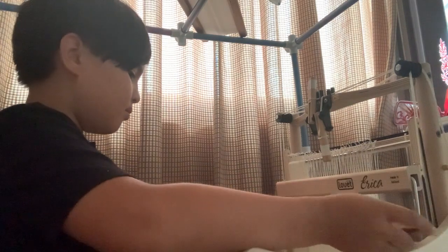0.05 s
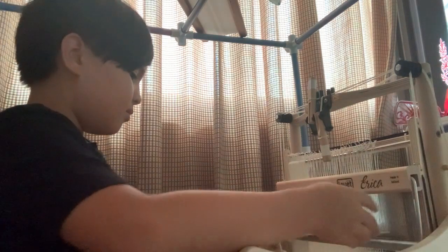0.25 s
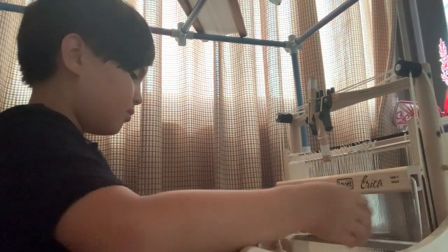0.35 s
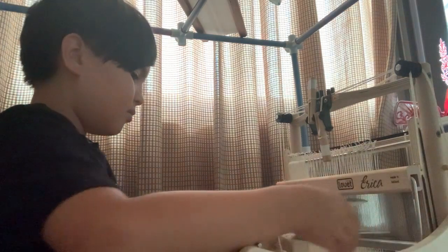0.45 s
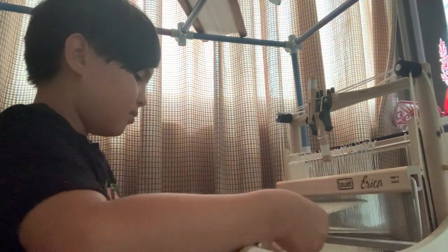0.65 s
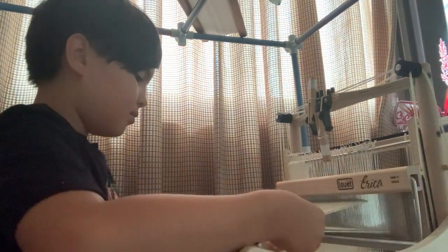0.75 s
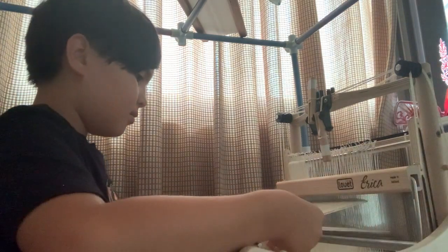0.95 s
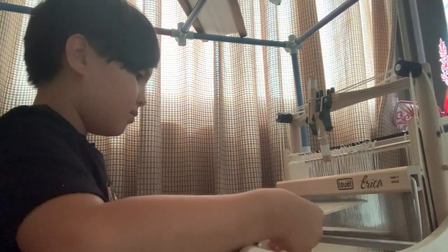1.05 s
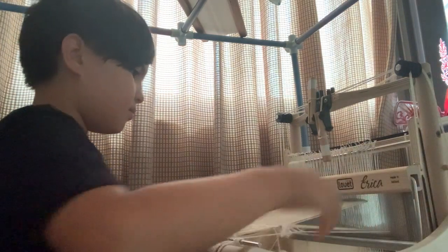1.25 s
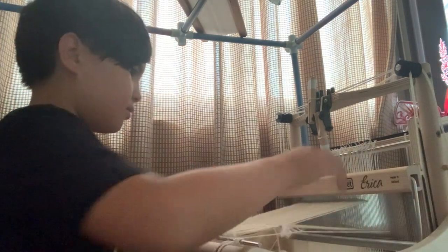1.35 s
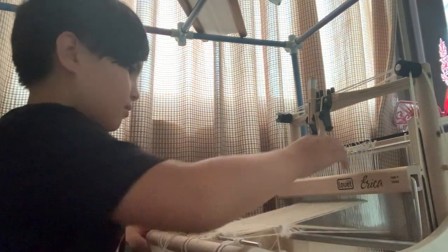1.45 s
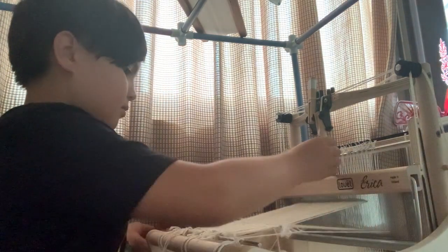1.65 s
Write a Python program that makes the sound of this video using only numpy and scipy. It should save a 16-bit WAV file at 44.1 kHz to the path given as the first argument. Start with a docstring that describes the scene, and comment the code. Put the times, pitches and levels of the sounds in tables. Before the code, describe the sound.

A wooden table loom clacks and ticks, heard close in a small room. A metal fitting clicks at about 0.1 seconds, then a part slides and drops with a sharp clack near 0.25 seconds, rebounding once. Soft hand bumps and faint clicks come around 0.5 and 0.75 seconds. A light stick ticks near 0.9, 1.1 and 1.2 seconds. Low rumble, hum and faint hiss lie underneath.

```python
"""Table loom in a small room

One microphone, close to a wooden loom worked by hand. A metal fitting clicks, then a wooden part
slides and drops against the frame with a sharp clack and one rebound; later a light stick ticks against
the loom. The hand bumps the wood softly in between. Each blow rings a few modes over a dense crack of
noise, sliding is a run of tiny slips, and the walls answer. Low rumble, hum and faint hiss lie under it."""
import sys
import numpy as np
from scipy import signal
from scipy.fft import rfft, irfft
from scipy.io import wavfile

SR = 44100
rng = np.random.default_rng(int(sys.argv[2]) if len(sys.argv) > 2 else 0)


def waveform_to_disk(signal):
    """Save audio, clipped to [-1, 1], as 16-bit WAV at the path in sys.argv[1]."""
    frames = np.transpose(np.atleast_2d(signal))
    scaled = np.clip(frames, -1, 1) * 32767
    samples = np.round(scaled).astype(np.int16)
    wavfile.write(sys.argv[1], SR, samples)


N = 74970
T = np.arange(N) / SR

# room tone: (frequency [Hz], relative spectral level [dB])
AIR_SPECTRUM = [(20, -44), (40, -13.5), (56, -0.5), (80, -5), (110, -11), (160, -11.5), (230, -15.5),
                (340, -15.5), (550, -20), (1100, -25.5), (3000, -30.5), (7000, -33), (14500, -32.5),
                (16000, -35.5)]
# moving parts rub: (start [s], stop [s], start level [dB], stop level [dB])
RUBS = [(0.0, 0.162, -92.5, -59.5), (0.126, 0.264, -67.5, -58.5), (0.23, 0.245, -54, -39),
        (0.49, 0.813, -77.5, -75.5), (1.074, 1.402, -68.5, -81)]
# resonances under the rubbing: (frequency [Hz], width [Hz], relative level [dB])
RUB_RESONANCES = [(1720, 26, -8), (2460, 250, -7), (3560, 74, -4), (7400, 220, -9.5)]

# blows on the fittings, by the hand, on the frame and of the stick:
# (time [s], gain [dB], bass cut [Hz], treble cut [Hz], gain of the modes over the crack [dB])
FITTING_CLICKS = [(0.1385, -39, 190, 16300, -4), (0.2715, -30, 1470, 2200, -7),
                  (0.5100, -48.5, 503, 8000, -2), (0.6820, -61.5, 2000, 6910, -11.5),
                  (0.7413, -62, 200, 9100, 0), (1.2475, -60.5, 1930, 13900, 6)]
HAND_BUMPS = [(0.1395, -56, 1804, 2480, -1.5), (0.5115, -49.5, 400, 2000, -1), (0.7425, -57, 100, 990, 0),
              (0.7755, -64.5, 199, 1200, 7.5), (1.2450, -57.5, 97, 1199, 0.5)]
FRAME_CLACKS = [(0.2343, -22.5, 1995, 14260, -6.5), (0.2360, -22.5, 60.4, 5000, 1.5),
                (0.3003, -25, 805, 4100, -7)]
STICK_TICKS = [(0.8882, -48, 2040, 14000, -1), (1.0260, -64.5, 1968, 9100, 2),
               (1.0822, -55, 990, 8850, 0.5), (1.0898, -49.5, 1010, 9900, -2),
               (1.2226, -47, 2980, 8850, -1), (1.2430, -57, 4070, 12000, -4),
               (1.2468, -50, 4120, 9900, -12.5)]
# the modes each one rings: (frequency [Hz], relative level [dB], t60 [s])
FITTING_RING = [(3401, -9.5, 0.036), (3614, -5.5, .1), (3700, 4.5, 0.024), (3667, -3, 0.051),
                (4250, -29, 0.039), (7030, -9.5, 0.085), (7913, -6.5, 0.01)]
BUMP_RING = [(590, -8.5, 0.12), (710, -5.5, 0.14), (760, 1.5, .05), (1390, -8, .06), (1774, -12, 0.055)]
FRAME_RING = [(107, -30, 0.23), (170, -28.5, .15), (382.2, -10, 0.039), (496, -5, 0.043), (686, -14, .035),
              (975, 1, 0.022), (1137, -11, 0.033), (1414, 0.5, 0.03), (1765, -1.5, 0.038),
              (2052, -4.5, .055), (2270, 2, 0.043), (2396, -6, 0.09), (2622, 0, 0.03), (2926, -0.5, 0.028),
              (3648, -4.5, 0.047), (4580, -9, .045)]
STICK_RING = [(1720, -19, .1), (2410, -15, .08), (3380, -4, .08), (3660, -8, .07), (4410, -14, .05),
              (4990, -7, .05), (5330, -7, .04), (5640, -4, .05), (6830, -9, .05), (8530, -12, .05),
              (7700, 0, .065), (11430, -9, .06)]
# each one's dense, quickly damped crack: (band centre [Hz], relative level [dB], t60 [s])
FITTING_BANDS = [(635, -14, 0.098), (1320, -5, 0.024), (2270, -18.5, 0.027), (3787, -3.5, 0.032),
                 (7000, -4.5, 0.043), (9900, 0.5, 0.0078), (14500, 2.5, 0.017)]
BUMP_BANDS = [(199, -17.5, 0.072), (600, -20.5, 0.014), (1500, -1.5, 0.055), (3000, -6, 0.027)]
FRAME_BANDS = [(400, -13.5, 0.09), (800, -11.5, 0.049), (1800, -4.5, 0.044), (3430, -5.5, 0.035),
               (7000, -4, 0.018), (11200, -19, 0.044), (15000, -16, 0.084)]
STICK_BANDS = [(930, -19.5, .04), (1850, -18.5, 0.12), (4840, -4.5, 0.025), (7440, -3, 0.023),
               (13000, -14.5, 0.041)]

# diffuse tail off the walls: (band centre [Hz], gain [dB], t60 [s])
ROOM_TAIL = [(148, -21, 0.52), (444, -10, 0.6), (1000, -7.5, 0.48), (2220, -16, 0.79), (4000, -4.5, 0.54),
             (8300, -2, 0.27), (14500, -1.5, .36)]


def from_db(db):
    """Decibels to gain."""
    return 10 ** (np.asarray(db) / 20)


def unit_rms(x):
    """Scale to unit rms."""
    return x / np.sqrt(np.mean(x ** 2) + 1e-20)


def log_hz():
    """Log frequency of every spectral bin."""
    return np.log(np.maximum(np.arange(N // 2 + 1) * SR / N, 1))


def noise_bands(table):
    """White noise split into overlapping bands, one round each row's centre frequency."""
    white = rfft(rng.standard_normal(N))
    log_centres = np.log([row[0] for row in table])
    return [irfft(white * np.interp(log_hz(), log_centres, share), N) for share in np.eye(len(table))]


def decay(t60):
    """Exponential fall of 60 dB in t60 seconds."""
    return from_db(-60 * T / t60)


def onset(rise_s):
    """A contact takes a moment to set the body going."""
    return 1 - np.exp(-(T / rise_s) ** 2)


def body(modes, bands, rise_s, crack_rise_s, ring_db, build_cycles=1.8, detune=0.0036):
    """One blow: separate modes, the low ones swelling later, over a crack that dies band by band."""
    ring = np.zeros(N)
    for hz, db, t60 in modes:
        detuned_hz = hz * (1 + detune * rng.standard_normal())
        tone = np.sin(2 * np.pi * (detuned_hz * T + rng.random()))
        ring += from_db(db) * decay(t60) * onset(rise_s + build_cycles / hz) * tone
    crack = sum(from_db(db) * decay(t60) * unit_rms(noise)
                for (_, db, t60), noise in zip(bands, noise_bands(bands)))
    bass_cut = signal.butter(4, 300, "high", fs=SR, output="sos")
    return from_db(ring_db) * ring + signal.sosfilt(bass_cut, crack * onset(crack_rise_s))


def struck(blows, modes, bands, rise_s, crack_rise_s=None):
    """Every blow rings the body afresh; glancing contacts are thinner, soft ones duller."""
    out = np.zeros(N)
    for time_s, db, bass_cut_hz, treble_cut_hz, ring_db in blows:
        blow = body(modes, bands, rise_s, crack_rise_s or rise_s, ring_db)
        pole = np.exp(-2 * np.pi * treble_cut_hz / SR)
        dulled = signal.lfilter([1 - pole], [1, -pole], blow + 1e-18)
        thinned = signal.lfilter(*signal.butter(1, bass_cut_hz, "high", fs=SR), dulled)
        start = int(time_s * SR)
        out[start:] += from_db(db) * thinned[:N - start]
    return out


def room_tone(air_db=-68, fall_db_per_s=1.94, hum_hz=121.3, hum_db=-69):
    """Low rumble and hiss sink slowly together under a steady electric hum."""
    hz, db = np.transpose(AIR_SPECTRUM)
    spectrum = from_db(np.interp(log_hz(), np.log(hz), db))
    air = unit_rms(irfft(rfft(rng.standard_normal(N)) * spectrum, N))
    hum = np.sqrt(2) * np.sin(2 * np.pi * (hum_hz * T + rng.random()))
    return from_db(air_db - fall_db_per_s * (T - T.mean())) * air + from_db(hum_db) * hum


def sliding_parts(slips_per_s=1100):
    """Tiny slips ring the fittings while parts move, swelling or easing off."""
    slips = rng.standard_normal(N) * (rng.random(N) < slips_per_s / SR)
    rub = sum(from_db(db) * unit_rms(signal.lfilter(*signal.iirpeak(hz, hz / width, fs=SR), slips))
              for hz, width, db in RUB_RESONANCES)
    push = sum(((T >= start) & (T < stop)) * from_db(np.interp(T, [start, stop], [start_db, stop_db]))
               for start, stop, start_db, stop_db in RUBS)
    return push * unit_rms(rub)


def fitting_clicks():
    """The metal fittings knock and ring briefly, high and bright."""
    return struck(FITTING_CLICKS, FITTING_RING, FITTING_BANDS, rise_s=0.00071)


def hand_bumps():
    """The soft hand meets the loom and the wood answers dully."""
    return struck(HAND_BUMPS, BUMP_RING, BUMP_BANDS, rise_s=0.0015)


def frame_clacks():
    """A wooden part drops hard against the frame and rebounds once."""
    return struck(FRAME_CLACKS, FRAME_RING, FRAME_BANDS, rise_s=0.00096, crack_rise_s=0.00063)


def stick_ticks():
    """A light wooden stick taps the loom and rings thinly."""
    return struck(STICK_TICKS, STICK_RING, STICK_BANDS, rise_s=0.00072)


def reflections(x, first_echo_s=0.002, wall_echo_s=0.017, early_db=-8.5):
    """Weak early echoes reach the microphone, then the diffuse tail off the near walls."""
    tail = sum(from_db(db) * noise * decay(t60) / np.linalg.norm(decay(t60))
               for (_, db, t60), noise in zip(ROOM_TAIL, noise_bands(ROOM_TAIL)))
    arrival = (T > first_echo_s) * np.where(T > wall_echo_s, 1, from_db(early_db))
    return signal.fftconvolve(x, tail * arrival)[:N]


def scene():
    """The loom close up and the small room behind it, in mono."""
    loom = frame_clacks() + fitting_clicks() + stick_ticks() + hand_bumps() + sliding_parts()
    return (loom + reflections(loom) + room_tone())[None]


def record(dry):
    """The microphone loses the deepest bass; the top is cut steeply."""
    bass_cut = signal.butter(3, 28, "high", fs=SR, output="sos")
    top_cut = signal.ellip(12, .1, 80, 16000, fs=SR, output="sos")
    return signal.sosfilt(top_cut, signal.sosfilt(bass_cut, dry))


dry = scene()
out = record(dry)
waveform_to_disk(out)
```